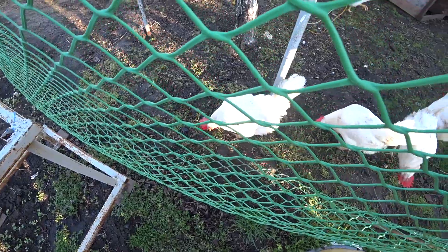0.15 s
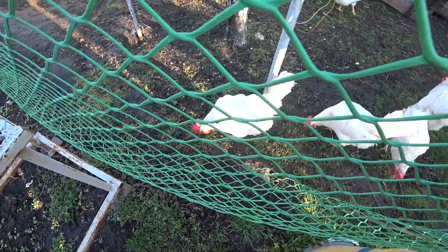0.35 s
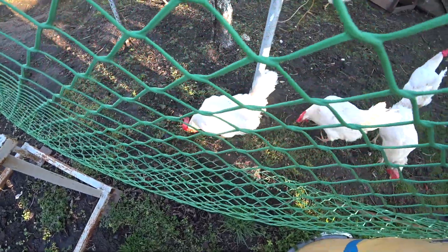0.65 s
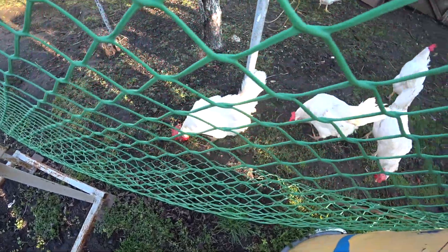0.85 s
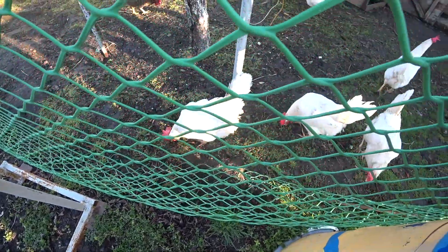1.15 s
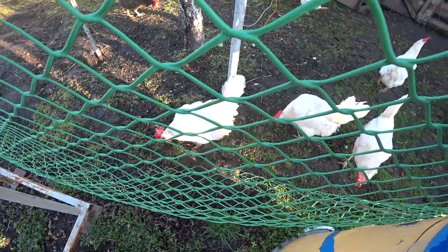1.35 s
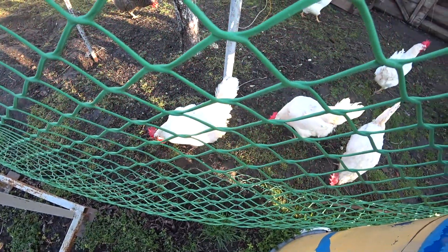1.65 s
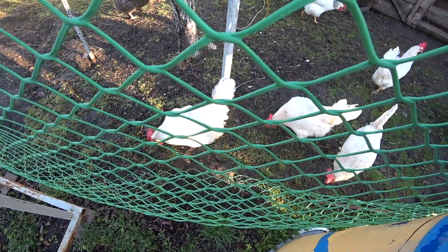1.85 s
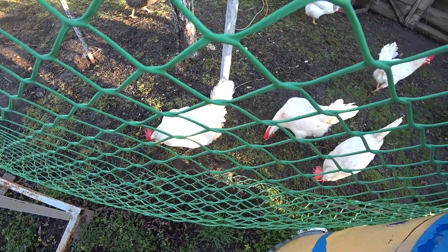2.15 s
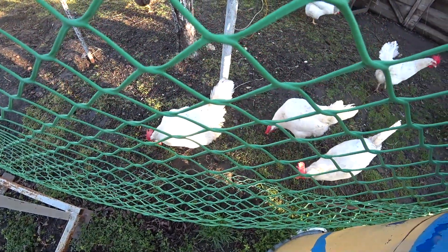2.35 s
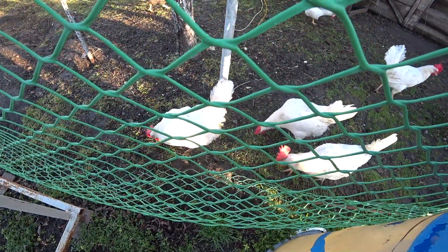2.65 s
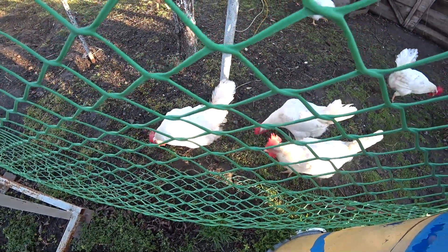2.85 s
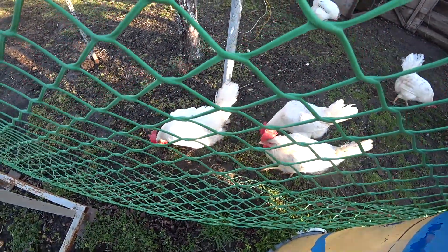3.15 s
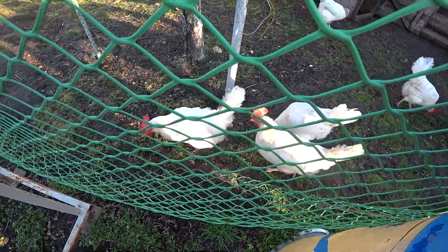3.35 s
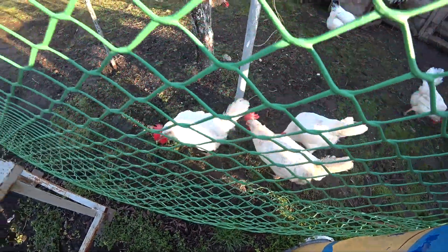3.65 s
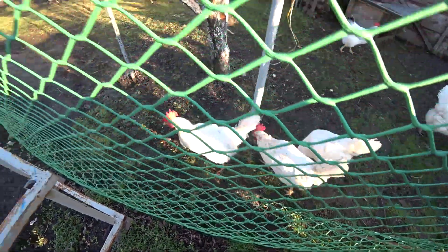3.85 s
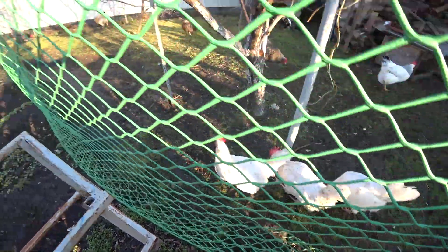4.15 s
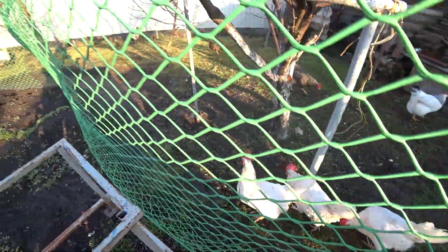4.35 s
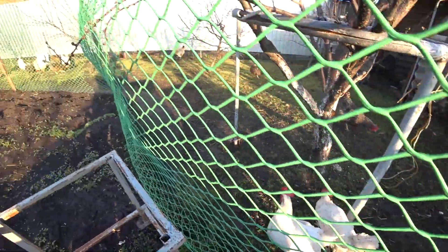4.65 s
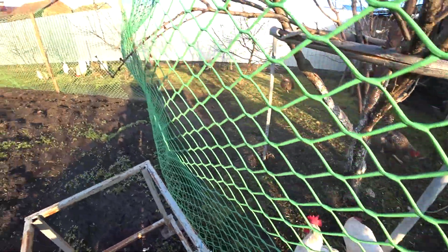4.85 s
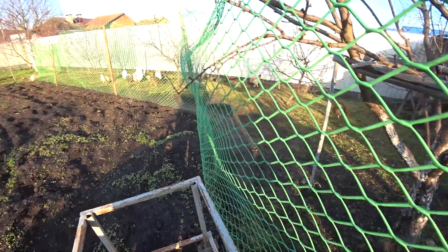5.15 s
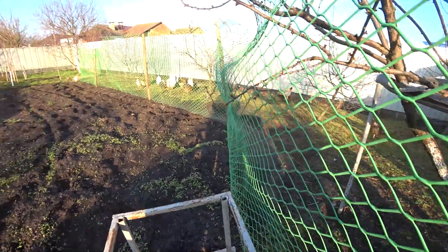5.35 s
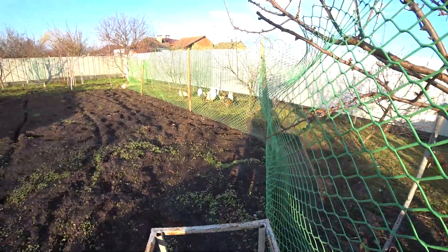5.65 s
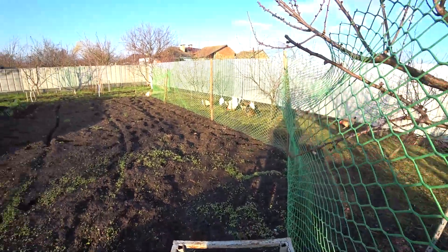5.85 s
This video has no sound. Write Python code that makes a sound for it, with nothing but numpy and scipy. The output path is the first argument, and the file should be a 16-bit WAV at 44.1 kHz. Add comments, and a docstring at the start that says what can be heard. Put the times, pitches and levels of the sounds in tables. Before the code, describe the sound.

A hen cackles in short clucks and long hoarse squawks in a yard, while other hens cluck softly and peck.

```python
"""A hen cackles in short clucks and long hoarse squawks, off to the right in a village yard.
Membranes in her voice box buzz, and her throat and beak shape the buzz. Her voice starts clean and
breaks up as she pushes it; the ground, a shed and the fences throw it back. Other hens cluck softly
and peck, and a small bird chirps once, over a low air rumble, faint microphone hiss and a far hum."""
import sys
import numpy as np
from scipy import signal
from scipy.fft import rfft, irfft, next_fast_len
from scipy.io import wavfile
from scipy.ndimage import uniform_filter1d, map_coordinates

SR = 44100
rng = np.random.default_rng(int(sys.argv[2]) if len(sys.argv) > 2 else 0)


def put_to_file(sound):
    """Save the sound as 16-bit audio at rate SR, in the file named by the first command-line argument."""
    columns = np.atleast_2d(sound).T  # one column per channel
    safe = np.clip(columns, -1, 1)
    whole_steps = np.round(safe * 32767)
    wavfile.write(sys.argv[1], SR, whole_steps.astype(np.int16))


N = 264159


def gain_of(db):
    """Turns decibels into a number to multiply a sound by."""
    return 10 ** (np.asarray(db) / 20)


def evened(x):
    """Scales a signal so that its average strength (rms) is 1."""
    return x / np.sqrt(np.mean(x ** 2) + 1e-20)


def steadied(x, size=500):
    """Holds the strength near 1 from moment to moment."""
    return x / np.sqrt(np.abs(uniform_filter1d(x ** 2, size)) + 1e-12)


def read(points, hz):
    """Looks up frequencies in a table, sliding between its rows on a log scale."""
    f, value = np.transpose(points)
    return np.interp(np.log(hz + 1), np.log(f + 1), value)


def add(mix, s, sound):
    """Adds a sound into the mix, starting at s seconds."""
    part = mix[max(round(s * SR), 0):][:len(sound)]
    part += sound[:len(part)]


def coloured(x, points):
    """Turns each frequency up or down by the dB given in a table."""
    hz = np.fft.rfftfreq(x.shape[-1], 1 / SR)
    return irfft(rfft(x) * gain_of(read(points, hz)), x.shape[-1])


def wander(count, rate_hz):
    """A smooth random wobble, mostly slower than the given rate."""
    hz = np.fft.rfftfreq(count, 1 / SR)
    spectrum = rfft(rng.standard_normal(count)) * (hz > 0)
    return evened(irfft(spectrum / (1 + (hz / rate_hz) ** 4), count))


def resonate(x, hz, width_hz):
    """A resonance: keeps the sound near one frequency, which may move."""
    turn = np.exp(2j * np.pi * np.cumsum(hz * np.ones(len(x))) / SR)
    r = np.exp(-np.pi * width_hz / SR)
    return 2 * (turn * signal.lfilter([(1 - r) ** 2], [1, -2 * r, r * r], x / turn + 1e-18)).real


def stretched(x, speed):
    """Plays a sound at a changing speed."""
    return map_coordinates(x, [np.cumsum(speed)], order=3)


def rumble_and_hiss(level_db=-42.5, swell=0.8):
    """Air rumbles, swelling and sinking nearly alike in both ears, under a faint microphone hiss."""
    # The tone of the low air rumble and the faint microphone hiss.
    # Each row: frequency in Hz, relative level in dB.
    noise_colour = [(10, -32), (25, -0.5), (48, -9), (95, -9.5), (160, -18.5), (300, -23), (700, -20),
                    (1500, -29.5), (3000, -35), (7000, -40.5), (9200, -42.5), (11800, -39.5),
                    (13000, -43.5), (16000, -44.5)]
    # How alike the ears are. Each row: frequency in Hz, likeness (1 means the same).
    ear_likeness = [(30, 0.89), (70, 1), (150, 0.77), (500, 0.17), (3000, 0.1), (15000, 0.17)]
    # The rumble's rise and fall. Each row: time in seconds, level in dB before swell scales it.
    rumble_levels = [(0, 1), (3.9, -0.5), (4.3, 7), (4.7, -1.5), (4.9, 12), (5.22, 9.5), (5.45, 1),
                     (5.99, -1)]
    hz = np.fft.rfftfreq(N, 1 / SR)
    left, other = rfft(rng.standard_normal((2, N)))
    same = np.clip(read(ear_likeness, hz), -1, 1)
    right = same * left + np.sqrt(1 - same ** 2) * other
    spectrum = np.array([left, right]) * gain_of(read(noise_colour, hz))
    bass = irfft(spectrum / (1 + (hz / 140) ** 4), N)
    s, db = np.transpose(rumble_levels)
    gust = gain_of(swell * np.interp(np.arange(N) / SR, s, db - db.mean()))
    return gain_of(level_db) * evened(irfft(spectrum, N) + (gust - 1) * bass)


def hum(hz=34.8, level_db=-43):
    """A deep, slightly wavering drone from far away."""
    turns = np.cumsum(hz * (1 + .04 * wander(N, 4))) / SR
    return gain_of(level_db) * np.sin(2 * np.pi * turns) * (1 + .15 * wander(N, 3))


def songbird(start_s=4.413, length_s=.036, top_hz=4600, fall_hz=700, level_db=-57):
    """One faint falling chirp of a small bird far off."""
    out, progress = np.zeros(N), np.linspace(0, 1, int(length_s * SR))
    turns = np.cumsum(top_hz - fall_hz * progress ** 2) / SR
    add(out, start_s, gain_of(level_db) * np.sin(np.pi * progress) * np.sin(2 * np.pi * turns))
    return out


def scatter(fade_times, start_s):
    """Many tiny random echoes for each ear; each frequency dies away at its own speed."""
    taps = rng.choice([-1., 1.], (2, SR)) * (rng.random((2, SR)) < 3000 / SR)
    taps *= np.arange(SR) > start_s * SR
    hz, t, bands = signal.stft(taps, SR, nperseg=256)
    fade = gain_of(-60 * t / read(fade_times, hz)[:, None])
    tail = signal.istft(bands * fade, SR, nperseg=256)[1]
    return tail / np.linalg.norm(tail, axis=1, keepdims=True)


def yard(x, clutter_db=-8, clutter_fade_s=0.03, tail_db=-14):
    """A sound from the right arrives directly, then bounces off nearby clutter, walls and fences."""
    # Echoes off the ground, shed and fence. Each row: delay in seconds, level in dB.
    echoes = [(.0037, -15), (.0083, -5), (0.0159, -5.5), (0.0223, -9.5), (0.034, -12.5)]
    # The yard's lingering sound. Each row: frequency in Hz, seconds to fade by 60 dB.
    fade_times = [(250, 1), (1200, 0.42), (3500, 0.6), (8000, 0.26)]
    # The shaded left ear gets more bass and less treble. Each row: frequency in Hz, change in dB.
    left_shade = [(200, 10.5), (500, -5.5), (1100, -10), (2200, -13.5), (4000, -6.5), (8000, -9)]
    response = np.zeros((2, SR))
    response[:, 0] = 1
    for delay, db in echoes:
        response[:, round(delay * SR)] += gain_of(db)
    response += gain_of(clutter_db) * scatter([(1000, clutter_fade_s)], start_s=0.00067)[:, :SR]
    response /= np.linalg.norm(response[1])
    left, right = signal.fftconvolve(x[None], response, axes=1)[:, :N]
    tail = signal.fftconvolve(x[None], scatter(fade_times, start_s=0.023), axes=1)[:, :N]
    return np.array([coloured(left, left_shade), right]) + gain_of(tail_db) * tail * gain_of([[-3], [0]])


def pecks(decay_s=0.002, ring_share=1.6):
    """Beaks strike grit: a dry snap with a brief ring."""
    # The pecks. Each row: start in seconds, level in dB, ringing frequency in Hz.
    strikes = [(.4, -39, 8550), (1.101, -33.5, 6700), (1.334, -37, 7200), (1.795, -36, 6560),
               (2.2352, -35.5, 4600), (2.295, -48, 5035), (2.72, -49, 7310), (2.928, -34.5, 7160),
               (3.187, -31, 8100), (3.597, -38, 7900), (4.56, -30, 7300), (4.58, -33.5, 9070),
               (5.029, -43, 8000)]
    # The tone of a snap. Each row: frequency in Hz, relative level in dB.
    snap_colour = [(300, -31), (1500, 3), (2600, 0.5), (4500, -9.5), (7500, -10.5), (10000, -19),
                   (13000, -9), (16000, -28)]
    out, t = np.zeros(N), np.arange(1024) / SR
    for s, db, hz in strikes:
        snap = coloured(rng.standard_normal(len(t)), snap_colour)
        ring = ring_share * resonate(snap, hz, width_hz=4100)
        add(out, s, gain_of(db) * evened(snap + ring) * np.exp(-t / decay_s))
    return out


def membrane(turns):
    """A membrane gives one pulse a cycle; its higher overtones lag, which spreads the pulse out."""
    return evened(sum(np.cos(2 * np.pi * k * turns - .3 * k * k) for k in np.arange(1, 23)))


def voice_box(hz, rough, jitter=0.0604, flutter=.014, drift=0.01253, shimmer=0.81, second_ratio=.85):
    """When forced, the pulses go uneven and group in twos and threes; a second membrane buzzes lower."""
    count = len(hz)
    unevenness = jitter * rough * wander(count, 80)
    unevenness += flutter * wander(count, 260)  # even a clean note is hoarse in the treble
    turns = np.cumsum(hz * (1 + unevenness + drift * wander(count, 19.3))) / SR
    second_turns = np.cumsum(hz * second_ratio * (1 + .07 * wander(count, 35.54))) / SR
    twos = 0.9 * wander(count, 26.3) * np.cos(np.pi * turns)
    threes = 0.63 * wander(count, 29.0) * np.cos(2 * np.pi * turns / 3)
    grouping = np.tanh(2 * rough * (twos + threes))
    strength = 1 + np.tanh(shimmer * rough * wander(count, 106))
    airflow = np.cos(2 * np.pi * turns)  # keeps the main note clear
    puffs = .45 * evened((1.5 + airflow) * rng.standard_normal(count))
    buzz = membrane(turns) * (1 + grouping) + 2.84 * rough ** 2 * membrane(second_turns) + rough * puffs
    return strength * buzz + 0.1 * rough * airflow


def throat(x, resonances):
    """The throat favours a few frequencies, which ring on after each pulse."""
    size = 2 * next_fast_len(len(x))
    hz = np.abs(np.fft.fftfreq(size, 1 / SR))
    power = sum(gain_of(db) ** 2 / (1 + (2 * (hz - f) / width) ** 2) ** 2 for f, width, db in resonances)
    response = np.exp(np.conj(signal.hilbert(np.log(power + 1e-9) / 2)))  # no ringing before a pulse
    return np.fft.ifft(np.fft.fft(x, size) * response).real[:len(x)]


def flock(rough=0.23):
    """Other hens cluck with their beaks shut: short, dull notes that fall in pitch."""
    # Soft clucks. Each row: start in seconds, level in dB, pitch in Hz, length in seconds,
    # fall as a share of the pitch.
    soft_clucks = [(0.802, -36.5, 213.3, 0.039, 0.37), (1.005, -35.5, 247, 0.027, 0.057),
                   (1.062, -36, 221, 0.035, 0.46), (1.145, -37, 221.6, 0.039, 0.04),
                   (1.268, -37.5, 323, 0.019, 0.039), (1.411, -37, 399.5, 0.028, .1),
                   (2.567, -37, 229.4, 0.042, 0.3), (2.868, -36.5, 220.6, .038, 0.335),
                   (3.433, -48, 676, 0.16, 0.1), (3.86, -42.5, 348, 0.14, 0.2),
                   (5.17, -38, 329, 0.1, 0.056)]
    # Throat resonances with the beak shut. Each row: frequency in Hz, width in Hz, level in dB.
    closed_throat = [(230, 440, -17), (396, 340, -8), (684, 200, -3), (1190, 1300, -15.5)]
    out = np.zeros(N)
    for s, db, hz, length, fall in soft_clucks:
        progress = np.linspace(0, 1, int(length * SR))
        buzz = voice_box(hz * (1 - fall * (progress - .5)), rough)
        add(out, s, gain_of(db) * evened(throat(buzz, closed_throat)) * np.sin(np.pi * progress))
    return out


def envelope(t, edge_s=0.0037, release_s=0.05, release_db=-14):
    """A call starts quickly, holds its level, then fades and stops."""
    edges = (1 - np.exp(-t / edge_s)) * (1 - np.exp((t - t[-1]) / edge_s))
    release = np.clip(1 - (t[-1] - t) / release_s, 0, 1)
    return edges * gain_of(release_db * release)


def hen_voice(pitch, rough, effort_db, bright_db, beak_hz, fray_s=0.037, beak_open_s=0.006):
    """The buzz passes through the windpipe, throat and beak, which change shape as she calls."""
    # Lower windpipe and throat resonances. Each row: frequency in Hz, width in Hz, level in dB.
    low_resonances = [(513, 96, -16.5), (686, 198, -4.5), (995, 134, 5), (1160, 320, -5.5), (1368, 342, 7),
                      (1714, 127, -5)]
    # The upper resonances, with the same columns.
    high_resonances = [(2335, 445, 9.5), (2582, 170, 6.5), (3270, 700, 7.5), (3690, 570, 7),
                       (4210, 740, -1.5), (4920, 860, -7.5), (5893, 630, -.5), (7330, 1740, -16.5),
                       (10050, 390, -24.5)]
    t = np.arange(len(pitch)) / SR
    push = np.clip((pitch - 520) / 100, -.5, 1)  # the highest notes come with the throat wide open
    shortening = 1 + 0.0311 * (push - push.mean())  # a shorter windpipe lifts all its resonances
    fray = 0.19 * np.exp((t - t[-1]) / fray_s)  # the voice gets rougher as a call ends
    buzz = voice_box(pitch / shortening, np.clip(rough + fray, 0, 1))
    low = stretched(throat(buzz, low_resonances), shortening)
    low += 1.28 * resonate(low, beak_hz, width_hz=380)
    hiss = .09 * rng.standard_normal(len(t))
    high = stretched(throat(buzz + hiss, high_resonances), shortening)
    high += 0.55 * push * resonate(high, hz=2700, width_hz=1100)
    opening_db = -5 * np.exp(-t / beak_open_s)  # the treble comes in as the beak opens
    voice = steadied(low) + gain_of(bright_db + opening_db) * steadied(high)
    return gain_of(effort_db) * envelope(t) * voice


def cluck(length, leap, drop, effort_db, push_db, bright_db, low_hz, high_hz, beak_hz, rough):
    """One push makes the voice leap to a higher, brighter, rougher note; then it drops back."""
    leap_s, drop_s = 0.0069, 0.01197  # how quickly the note changes
    low_sag, high_sag = 106.3, 262  # Hz per second: the pitch sinks as the air runs out
    t = np.arange(0, length, 1 / SR)
    push = .25 * (1 + np.tanh((t - leap) / leap_s)) * (1 + np.tanh((drop - t) / drop_s))
    pitch = (1 - push) * (low_hz - low_sag * t) + push * (high_hz - high_sag * (t - leap))
    roughness = rough * (push + 0.79 * (1 - push))
    return hen_voice(pitch, roughness, effort_db + push_db * push,
                     bright_db + 3 * push, beak_hz + 67 * push)


def squawk(curve, rest_hz=463.6, climb_hz=85.5):
    """A long whine that climbs in steps and breaks up; the higher it goes, the brighter it gets."""
    s, *columns = np.transpose(curve)
    t = np.arange(s[0], s[-1], 1 / SR)
    pitch, rough, effort_db, beak_hz = (np.interp(t, s, column) for column in columns)
    bright_db = -12 + 7.5 * np.tanh((pitch - rest_hz) / climb_hz)
    return hen_voice(pitch, rough, effort_db, bright_db, beak_hz)


def hen():
    """The hen cackles in bouts of clucks with squawks between them."""
    # Her clucks. Each row: start, length, time until the leap and time until the drop in seconds;
    # effort, extra level of the push and brightness in dB; low pitch, high pitch and beak resonance
    # in Hz; roughness from 0 to 1.
    clucks = [ (0.0, 0.051, 0.08, 0.061, -19, -3, -9.5, 482.2, 476, 1230, 0.45),
              (0.133, 0.13, 0.02, 0.083, -22.5, 2.5, -9.5, 478, 606.4, 1194, 0.48),
              (0.365, .16, 0.021, 0.053, -23.5, 1, -9.5, 483.3, 554, 1090, 0.41),
              (.621, 0.15, .035, 0.12, -22, 0.5, -11, 469.5, 559, 1150, 0.47),
              (.907, 0.19, 0.022, 0.087, -22.5, 0.5, -11.5, 481.2, 578, 1134, .38),
              (1.189, 0.14, 0.032, .12, -21.5, 0, -11, 470, 565, 1130, 0.44),
              (1.452, .12, 0.017, 0.093, -23, 3, -13.5, 476, 552.5, 1100, 0.61),
              (1.696, .19, .014, .082, -22, 0.5, -11.5, 484, 564.6, 1120, 0.41),
              (1.999, 0.14, 0.0099, 0.071, -24, 4, -12, 472, 582.2, 1110, 0.58),
              (3.578, .26, .018, 0.082, -22.5, 3.5, -9.5, 504.6, 604.5, 1258, 0.39),
              (3.943, .19, .012, .078, -24, 5.5, -10, 482, 616, 1120, 0.37),
              (5.16, .13, .015, 0.12, -24, 5.5, -9, 529.6, 639.5, 1236, 0.46),
              (5.4, 0.2, .022, 0.081, -23, 6.5, -10, 502.8, 621.5, 1188, 0.33),
              (5.692, 0.13, 0.015, 0.096, -24, 6, -10, 529, 626.7, 1234, 0.44),
              (5.945, 0.11, 0.021, 0.066, -24, 4, -8, 528, 614, 1150, 0.55)]
    # Her squawks, one list each. Each row: time in seconds, pitch in Hz, roughness from 0 to 1,
    # effort in dB, beak resonance in Hz.
    squawks = [
        [(2.343, 466.4, 0.33, -21.5, 1080), (2.378, 487, 0.23, -22, 1200), (2.42, 460, 0.08, -22, 1070),
         (2.472, 497.6, 0.17, -23, 1140), (2.52, 498.8, 0.7, -21, 1350), (2.625, 502.6, 0.42, -31, 1266)],
        [(2.909, 447, 0.21, -24, 1270), (2.962, 465.9, 0.16, -24.5, 1060), (3.02, 485.2, 0.54, -20, 1440),
         (3.09, 529.4, 0.43, -22.5, 1340), (3.185, 538.6, 0.49, -19.5, 1350), (3.235, 542.6, 0.45, -22, 1290),
         (3.265, 608, 0.37, -20.5, 1260), (3.314, 599.4, .4, -26, 1240), (3.342, 487.6, 0.42, -21.5, 1410),
         (3.42, 482.5, .4, -36.5, 1490)],
        [(4.569, 462.4, 0.31, -25, 1042), (4.619, 460, 0.3, -21.5, 1160), (4.66, 506.6, 0.25, -23.5, 1080),
         (4.694, 494.3, 0.21, -20.5, 1160), (4.726, 582.3, 0.44, -21, 1265), (4.88, 575.4, 0.43, -20, 1400),
         (4.91, 622, 0.52, -18.5, 1290), (4.965, 624.6, 0.56, -20.5, 1370), (5.02, 508, 0.18, -20, 1320),
         (5.06, 558, 0.3, -22.5, 1082), (5.115, 516.7, 0.23, -26, 1110)],
    ]
    out = np.zeros(N)
    for start, *row in clucks:
        add(out, start, cluck(*row))
    for curve in squawks:
        add(out, curve[0][0], squawk(curve))
    return out


def scene(hen_db=3):
    """The hen is on the right; the flock and its pecks sound straight ahead and through the yard too."""
    # The microphone turns away from her. Each row: time in seconds, change on the left in dB.
    left_levels = [(0, 1), (2.6, 2), (4.2, 1.5), (4.7, -0.5), (5.99, 1)]
    cackle, taps, soft_clucks = hen(), pecks(), flock()
    birds = yard(gain_of(hen_db) * cackle + 0.59 * soft_clucks + 0.98 * taps)
    birds[0] *= gain_of(np.interp(np.arange(N) / SR, *np.transpose(left_levels)))
    return birds + .5 * soft_clucks + taps + songbird() + rumble_and_hiss() + hum()


def record(dry, cutoff_hz=15900):
    """Cuts away the very highest treble."""
    lowpass = signal.firwin(511, cutoff_hz, window=("kaiser", 9), fs=SR)
    return signal.oaconvolve(dry, lowpass[None], "same")


dry = scene()
out = record(dry)
put_to_file(out)
```